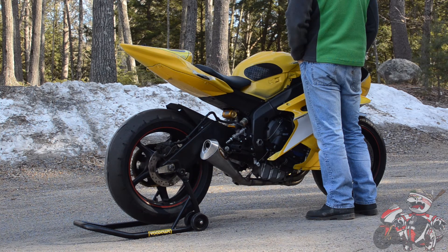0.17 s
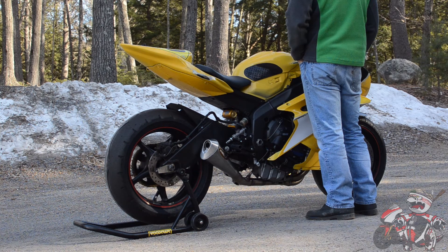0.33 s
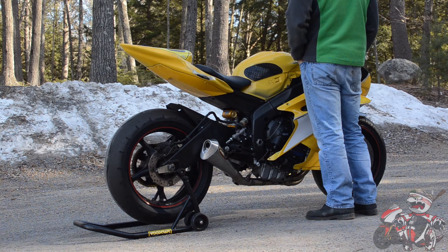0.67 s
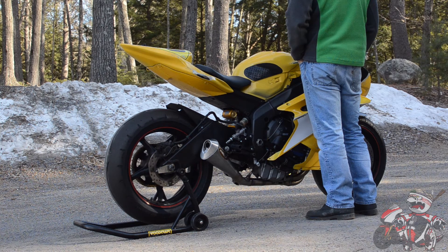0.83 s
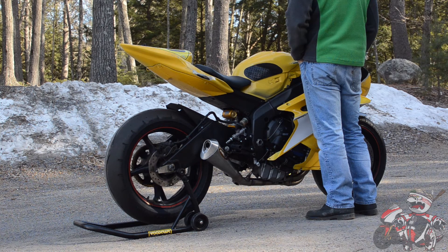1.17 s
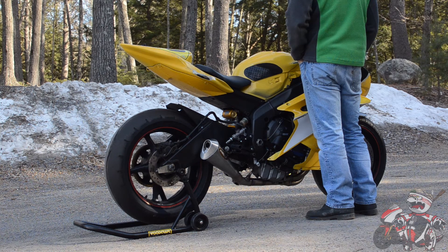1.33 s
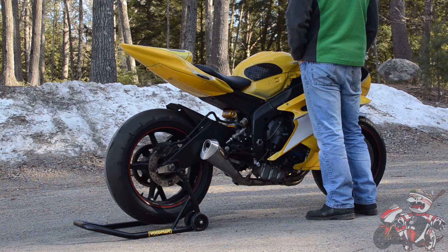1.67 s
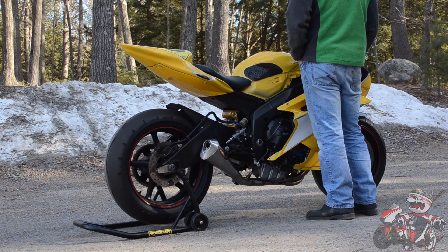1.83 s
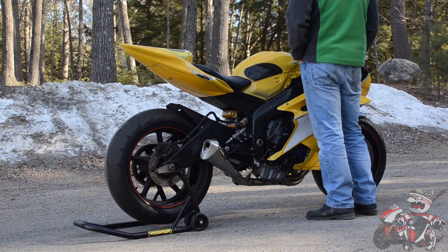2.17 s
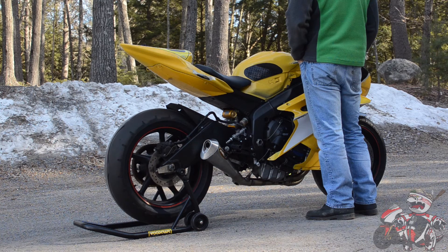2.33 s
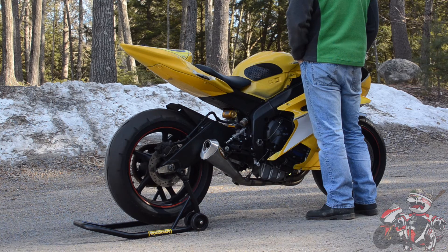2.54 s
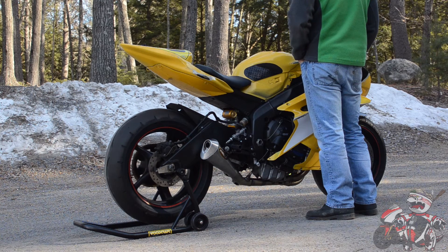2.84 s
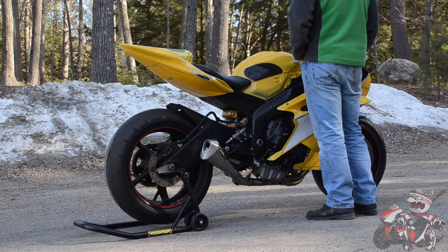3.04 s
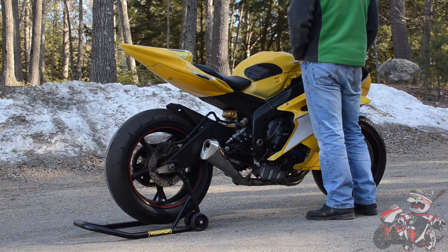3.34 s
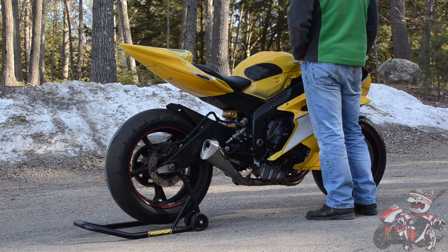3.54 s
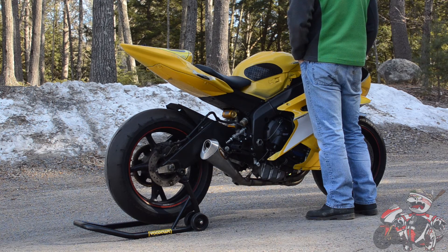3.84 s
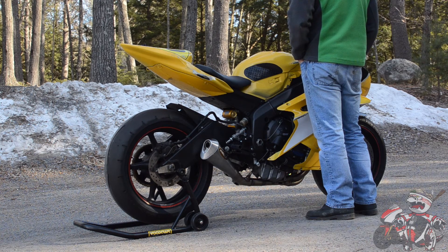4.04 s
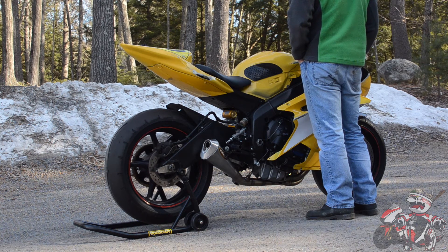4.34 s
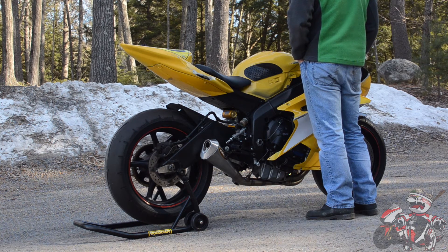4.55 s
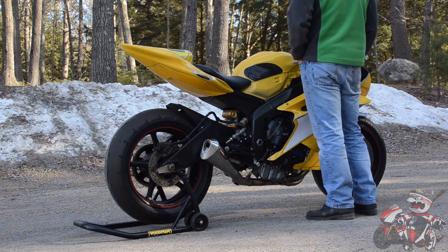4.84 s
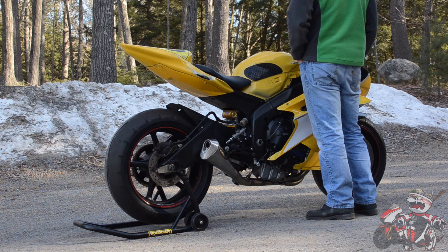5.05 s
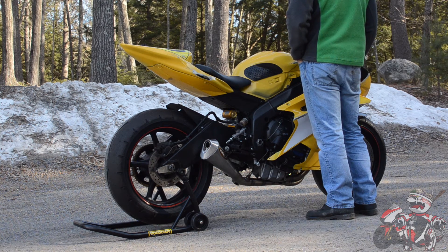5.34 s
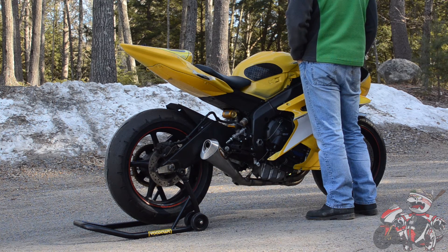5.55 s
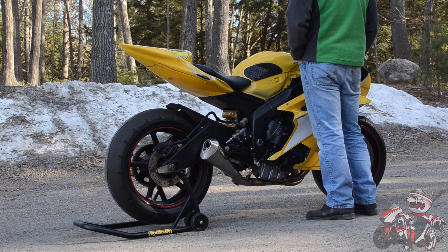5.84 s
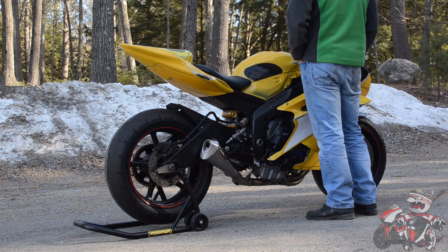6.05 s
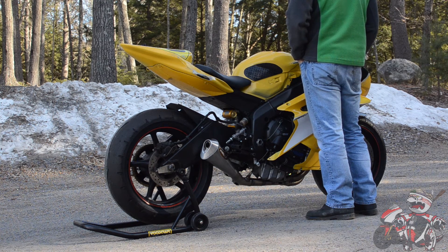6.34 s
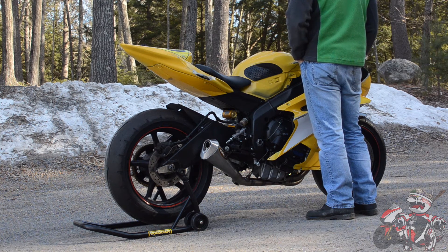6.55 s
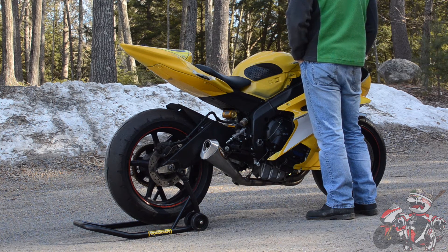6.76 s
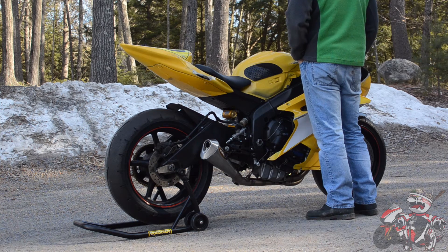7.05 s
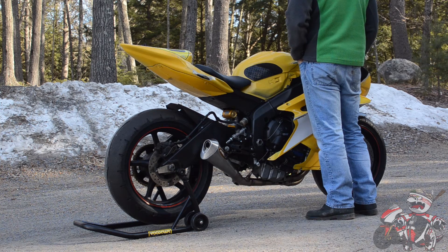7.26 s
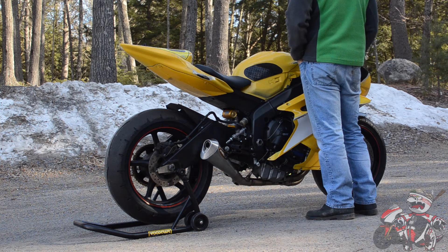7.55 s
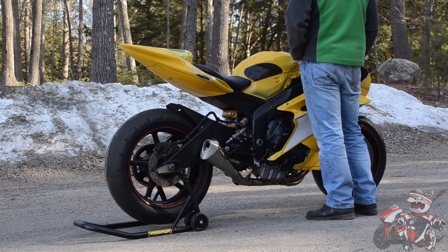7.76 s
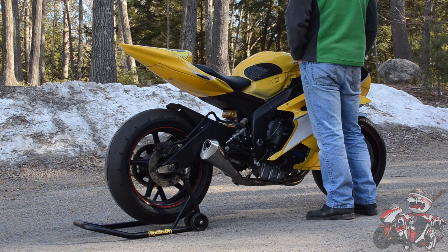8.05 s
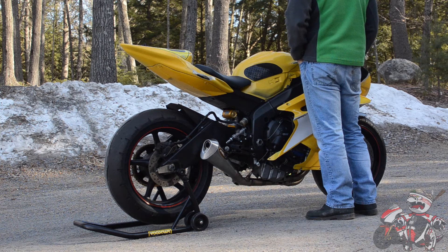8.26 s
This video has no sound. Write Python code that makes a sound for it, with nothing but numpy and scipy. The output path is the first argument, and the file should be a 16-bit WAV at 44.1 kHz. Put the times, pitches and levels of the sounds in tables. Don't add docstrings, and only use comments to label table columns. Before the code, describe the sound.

A four-cylinder sport motorcycle on a stand, heard close beside its short exhaust on an outdoor gravel road. It begins already revving with a tight, raspy buzz; from about 0.3 s the pitch sweeps up, reaching a loud, hard, metallic howl by 1.5 s. This is held until about 3.6 s, slightly rough with small stumbles. The throttle is let go with a sharp crack and a barking rasp, and the pitch slides steadily down, burbling, with thuddy pops between 4 and 4.8 s. Around 5.2 s it settles to a low, lumpy, breathy idle. From about 6.1 s a blip swells to a throaty bark, peaking near 6.5 s, then falls with scattered pops. A quicker blip rises at 7.4 s, peaks near 7.75 s, and drops away crackling. Faint, short tree echoes smear the sound; the loudest peaks are gritty and clipped.

```python
import sys
import numpy as np
from scipy import signal
from scipy.fft import rfft, irfft
from scipy.io import wavfile
from scipy.ndimage import uniform_filter1d

SR = 44100
rng = np.random.default_rng(int(sys.argv[2]) if len(sys.argv) > 2 else 0)


def field_ratio(decibels):
    return 10 ** (np.asarray(decibels, dtype=float) / 20)


def pcm_store(signal):
    levels = np.round(np.clip(np.atleast_2d(signal), -1, 1) * 32767)
    wavfile.write(sys.argv[1], SR, levels.astype(np.int16).T)


N = 370881

# frequency in Hz, gain in dB.
TURBULENCE = [(320, -19.5), (550, -6.5), (790, -6.5), (1020, -5), (1190, 1), (1420, 1.5), (1600, 2.5),
              (1860, 0.5), (2030, 3.5), (2190, 0.5), (2890, -3.5), (3300, -17), (3600, -4), (4680, -30),
              (7920, -120)]
# start in seconds, firings in Hz, pace down the coasting path,
# length of the fuel cut in seconds, extra spit in the cut in dB.
LIFTS = [
    (3.585, 458.3, 1.01, .47, 11.5),
    (6.465, 273, 1.14, 0.23, 1),
    (7.75, 278.8, 1.005, 0.173, 6),
]
# engine catches in seconds, twist begins in seconds, firings until then in Hz.
TWISTS = [
    (5.255, 6.11, 63.15),
    (7.39, 7.444, 90.45),
]
SETTLE_S = .02


def engine():
    hz = speed()
    levels_db, (uneven, turbulent, gated, paired) = throttle(hz)
    shut = np.clip(-uniform_filter1d(np.gradient(hz), 600) * SR / 90, 0, 1)
    blows, pulses, fronts, puff, snap = firings(hz, shut, uneven, paired)
    thump = pipe_thump(blows, hz, shut)
    rasp = muffler_rasp(pulses, puff, hz, shut, turbulent, gated)
    hiss = gas_hiss(puff, gated)
    spit = sharp_spit(fronts, puff, snap, gated)
    return (field_ratio(levels_db) * np.array([thump, rasp, hiss, spit])).sum(0)


def firings(hz, shut, uneven, paired):
    header_ms = .09
    turns = np.cumsum(hz) / SR
    count = np.arange(1, int(turns[-1]))
    places = np.interp(count, turns, np.arange(N))
    chance = rng.standard_normal((4000, 4))[:len(count)]
    strength_luck, timing_luck, puff_luck, snap_luck = chance.T
    at = places.astype(int)
    rough, odd, period, closed = uneven[at], paired[at], SR / hz[at], shut[at]
    pair = count % 2
    strong_weak = 1 - 2 * pair

    fired = 1 + .6 * odd * (1 - closed) * strong_weak
    wander = rough * (.08 + .09 * closed)
    shift = .27 * odd * pair * (odd > .13) + wander * timing_luck
    blows = clicks(places + period * shift, fired + rough * strength_luck)

    late = (header_ms * pair + 0.12 * rough * timing_luck) * SR / 1000
    pulses = clicks(places + late, (1 + odd * strong_weak) * (1 + .45 * rough * strength_luck))
    fronts = evened(clicks(places + late, field_ratio(5.0 * snap_luck)))

    t = np.arange(400) / SR
    puff = signal.oaconvolve(clicks(places, field_ratio(3.4 * puff_luck)), t * np.exp(-t / 0.0015))[:N]
    snap = signal.oaconvolve(clicks(places, field_ratio(3.2 * snap_luck)), t * np.exp(-t / 0.00061))[:N]
    return blows, pulses, fronts, evened(puff), evened(snap)


def pipe_thump(blows, hz, shut):
    # frequency in Hz, gain in dB.
    pipe_middle = [(18, -96), (30, -56), (90, 0), (150, 14), (200, 2.5), (265, 9.5), (320, 1), (400, 9),
                   (530, -1), (680, -8.5), (900, -7.5), (1980, -75)]
    pipe_slow = [(18, -99), (35, -29), (62, 4), (125, 7), (190, 8.5), (255, 6), (330, -1), (410, 1.5),
                 (470, -7.5), (520, -8.5), (650, -14.5), (900, -19.5), (1760, -107)]
    pipe_fast = [(18, -102), (50, -90), (110, -2.5), (160, -3), (230, 0), (290, -11.5), (360, 0),
                 (450, -11.5), (560, -6.5), (640, -24.5), (730, -10), (900, -27.5), (1980, -83)]
    slow = np.clip((120 - hz) / 50, 0, 1)
    fast = (1 - shut) * np.clip((hz - 185) / 55, 0, 1)
    echoed = blows + 0.42 * np.roll(blows, round(0.00659 * SR))
    slow_thump = evened(colour(echoed, pipe_slow, lag=0.92))
    fast_thump = evened(colour(blows, pipe_fast))
    open_blow = colour(blows, pipe_middle, lag=0.47)
    shut_blow = colour(blows, pipe_middle)
    middle_thump = evened((1 - shut) * open_blow + shut * shut_blow)
    thump = slow * slow_thump + fast * fast_thump + (1 - slow - fast) * middle_thump
    return evened(above_firing(thump, hz))


def above_firing(x, hz):
    f, t, z = signal.stft(x, SR, nperseg=2048, noverlap=1536)
    edge_hz = .55 * np.interp(t, np.arange(N) / SR, hz)
    gain = .2 + .8 / (1 + (edge_hz / (f[:, None] + 1)) ** 6)
    return signal.istft(z * gain, SR, nperseg=2048, noverlap=1536)[1][:N]


def muffler_rasp(pulses, puff, hz, shut, turbulent, gated):
    # frequency in Hz, gain in dB.
    muffler_hot = [(350, -39), (650, -24.5), (900, -14), (1080, -15.5), (1250, 0), (1400, -1), (1600, -9.5),
                   (1720, -10.5), (1850, 2), (2050, 6.5), (2300, -8.5), (2750, -7.5), (3250, -22),
                   (3800, -12), (5000, -18), (9900, -86.5)]
    muffler_cool = [(350, -57), (600, 2.5), (1000, -12), (1500, 6.5), (1750, -5), (2050, 5), (2500, -8.5),
                    (3300, -18), (4000, -12.5), (9900, -75)]
    muffler_shut = [(350, -28), (600, 10.5), (850, 2), (1050, 8.5), (1300, 11), (1500, 20), (1750, 3.5),
                    (2200, 13), (2500, 3), (2800, 11.5), (3250, -5.5), (3900, 4), (5000, -7), (9900, -90)]
    hot = np.clip((hz - 390) / 50, 0, 1)
    ring = hot * evened(colour(pulses, muffler_hot)) + (1 - hot) * evened(colour(pulses, muffler_cool))
    ring = (1 - shut) * ring + shut * evened(colour(pulses, muffler_shut))
    gusts = colour(rng.standard_normal(N) * (1 + 0.031 * gated * puff), TURBULENCE)
    return np.sqrt(1 - turbulent) * evened(ring) + np.sqrt(turbulent) * evened(gusts)


def gas_hiss(puff, gated):
    # frequency in Hz, gain in dB.
    hiss_tone = [(1760, -52.5), (3000, -2), (3250, -4.5), (3740, -8), (4570, -5.5), (5260, -6), (5660, -1),
                 (6200, -7), (8070, -8), (9030, -13.5), (11500, -34.5), (15000, -44), (22000, -120)]
    return evened(colour(rng.standard_normal(N) * (1 - gated + 0.26 * gated * puff), hiss_tone))


def sharp_spit(fronts, puff, snap, gated):
    # frequency in Hz, gain in dB.
    spit_tone = [(5590, -16), (9500, 8.5), (11500, -1), (12800, -1), (15600, -10)]
    spray = rng.standard_normal(N) * (1 - gated + gated * (.6 * puff + 1.3 * snap))
    return evened(colour(spray + 0.65 * gated * fronts, spit_tone))


def speed():
    # time in seconds, firings in Hz.
    climb = [
        (0.0, 282),
        (0.3, 283.6),
        (0.42, 293.4),
        (0.72, 353.3),
        (1.1, 421.6),
        (1.35, 444),
        (1.66, 451.2),
        (2.86, 454.2),
        (3.56, 459.5),
    ]
    # time since full speed in seconds, firings in Hz.
    coast = [(0, 459.2), (.17, 376.9), (.52, 261.8), (.78, 198.6), (1.1, 136.8), (1.29, 107.6),
             (1.43, 86.5), (1.62, 64.23), (1.7, 55)]
    rise = [(0, 0.01), (.38, .25), (.55, .46), (.8, .82), (.93, .98), (1, 0.98)]
    hunt_share, hunt_s = .0035, .09
    t = np.arange(N) / SR
    hz = np.interp(t, *np.transpose(climb))
    since, path = np.transpose(coast)
    twists = TWISTS + [(0, 99, 0)]
    peaks = LIFTS[1:] + [(100, 0)]
    for (lift, top_hz, pace, *_), (_, twist, rest_hz), (peak, peak_hz, *_) in zip(LIFTS, twists, peaks):
        entry = np.interp(-np.log(top_hz), -np.log(path), since)
        falling = np.exp(np.interp(entry + pace * (t - lift), since, np.log(path)))
        coasting = np.maximum(falling, rest_hz)
        climbed = np.interp((t - twist) / (peak - twist), *np.transpose(rise))
        rising = rest_hz + (peak_hz - rest_hz) * climbed
        hz = np.where(t < lift, hz, np.where(t < twist, coasting, rising))
    hunt = drift(N, hunt_s)
    return uniform_filter1d(hz, round(SETTLE_S * SR)) + hunt_share * np.sqrt(450 * hz) * hunt / hunt.std()


def throttle(hz):
    # firings in Hz, then pipe thump, muffler rasp,
    # gas hiss and sharp spit in dB.
    open_mix = [(62, -18.5, -28.5, -30, -47), (90, -11, -25, -27.5, -46), (106.15, -8, -21.5, -24, -39),
                (150, -5.5, -16, -22, -33.5), (220.1, -7, -9, -31, -39), (249.3, -11.5, -12.5, -26.5, -51),
                (285, -20, -12, -28.5, -49), (358.6, -18, -12, -27.5, -46), (433.4, -16.5, -11, -24.5, -39),
                (419, -18, -10.5, -24, -38.5)]
    shut_mix = [(68, -21, -28.5, -31.5, -54), (104, -18.5, -25.5, -28, -52), (137, -11, -22, -25.5, -48),
                (200, -14, -19, -25, -50), (266.7, -14, -18, -28, -49), (308.4, -18, -17, -26.5, -50),
                (365, -16.5, -15, -28.5, -49), (431.4, -15.5, -15, -25, -47)]
    # firings in Hz, then from 0-1 the
    burn_open = [(63, .21, .92, .8, .14), (150, .15, .6, .8, .05), (262, .12, .28, .55, .18),
                 (284, .24, .3, .3, .25), (310, .16, .09, .3, .2), (440, .14, .12, .3, .12)]
    burn_cut = [(200, .06, .33, .5, .3), (270, .05, .17, .5, .3), (450, .04, .08, .7, .3)]
    burn_lean = [(64, .25, .92, .8, .15), (110, .31, .82, .62, .13), (160, .24, .68, .55, .15),
                 (270, .22, .5, .55, .23)]
    # time in seconds, extra unevenness 0-1.
    stumbles = [
        (1.55, .1),
        (1.93, .22),
        (2.42, .18),
        (2.87, .22),
        (3.57, .12),
        (5.4, .12),
        (5.6, .15),
    ]
    stumble_s = .13
    dip_db, dip_s, bark_db, bark_s = -3.5, 0.013, 5.5, 0.31
    clean_s = 0.307
    surge_db, burble_db, surge_s = .55, .5, .03

    t = np.arange(N) / SR
    lift, _, _, cut_s, spit_db = np.transpose(LIFTS)[..., None]
    catch = np.append(np.transpose(TWISTS)[0], 99)[:, None]
    settle = round(SETTLE_S * SR)
    closed = uniform_filter1d(((t > lift) & (t < catch)).sum(0) * 1., settle)
    cuts = uniform_filter1d(((t > lift) & (t < lift + cut_s)) * 1., settle)
    cut = (cuts * np.clip((lift + clean_s - t) / SETTLE_S, 0, 1)).sum(0)
    lean = np.maximum(closed - cut, 0)

    levels = (1 - closed) * by_speed(open_mix, hz) + closed * by_speed(shut_mix, hz)
    levels[:2] += dip_db * np.exp(-((t - lift) / dip_s) ** 2).sum(0)
    bark = ((t > lift + dip_s) * np.exp(-abs(t - lift) / bark_s)).sum(0)
    levels[1:3] += bark_db * (hz / 450) ** 2 * bark
    levels[3] += (spit_db * cuts).sum(0)
    surge = drift((4, N), surge_s)
    levels += (surge_db + burble_db * lean) * surge / surge.std()

    burn = (1 - cut - lean) * by_speed(burn_open, hz)
    burn += cut * by_speed(burn_cut, hz) + lean * by_speed(burn_lean, hz)
    stumble = sum(extra * np.exp(-((t - s) / stumble_s) ** 2) for s, extra in stumbles) * (1 - cut)
    burn[:2] += stumble * np.array([[1], [.35]])
    return levels, np.clip(burn, 0, .98)


def by_speed(rows, hz):
    f, *columns = np.transpose(rows)
    return np.array([np.interp(np.log(hz), np.log(f), c) for c in columns])


def pops():
    # start in seconds, push peak in dB, crack in dB.
    pop_list = [(3.584, -45, -5), (4.042, -39, -4), (4.189, -33, -27), (4.329, -30, -11), (4.399, -21, -17),
                (4.449, -35, -21), (4.529, -22, -27), (4.619, -36, -27), (4.746, -19, -11),
                (6.459, -39, -12), (6.749, -31, -25), (6.799, -24, -24), (6.979, -17, -24),
                (7.089, -21, -23), (7.308, -23, -29), (7.739, -45, -7), (7.979, -34, -19),
                (8.019, -27, -14), (8.119, -22, -24), (8.199, -28, -22), (8.329, -22, -15)]
    s, push_db, crack_db = np.transpose(pop_list)
    t = np.arange(2500) / SR
    push = np.sin(2 * np.pi * 75 * t) * np.exp(-t / .02) * (1 - np.exp(-t / .003))
    crack = rng.standard_normal(len(t)) * np.exp(-t / .0009)
    crack = colour(np.pad(crack, (0, N - len(t))), TURBULENCE)[:len(t)]
    crack = crack / abs(crack).max()
    pushes = signal.oaconvolve(clicks(s * SR, field_ratio(push_db + 2.0)), push)
    cracks = signal.oaconvolve(clicks((s + 0.000966) * SR, field_ratio(crack_db + 1)), crack)
    return (pushes + cracks)[:N]


def tree_echoes(bike):
    t = np.arange(9000) / SR
    trees = rng.standard_normal(len(t)) * field_ratio(-60 * t / 0.15) * (t > .012)
    return field_ratio(-19) * signal.oaconvolve(bike, trees / np.linalg.norm(trees))[:N]


def colour(x, points, lag=1):
    f, db = np.transpose(points)
    hz = abs(np.fft.fftfreq(8192, 1 / SR))
    gain_db = np.interp(np.log(hz + 1), np.log(f + 1), db)
    log_gain = np.log(field_ratio(np.maximum(gain_db, -90)))
    taps = np.fft.ifft(np.exp(log_gain - 1j * lag * signal.hilbert(log_gain).imag)).real
    return signal.oaconvolve(x, np.roll(taps, 1024)[:5120])[1024:N + 1024]


def smoothed(x, size):
    return uniform_filter1d(uniform_filter1d(x, size), size)


def drift(shape, seconds):
    return smoothed(rng.standard_normal(shape), round(seconds * SR))


def evened(x):
    return x / np.sqrt(abs(smoothed(x ** 2, 3000)) + 1e-20)


def clicks(places, sizes):
    at = np.floor(places)[:, None].astype(int) + np.arange(-7, 9)
    off = at - places[:, None]
    shape = np.sinc(off) * np.cos(np.pi * off / 16) ** 2
    out = np.zeros(N + 64)
    np.add.at(out, np.clip(at, 0, N + 63), sizes[:, None] * shape)
    return out[:N]


def scene():
    bike = engine() + pops()
    return (bike + tree_echoes(bike))[None]


def low_pass(x):
    return signal.sosfilt(signal.butter(12, 15710, fs=SR, output="sos"), x)


def record(dry):
    # frequency in Hz, width in Hz, depth 0-1.
    notches = [(5690, 250, 0.96), (6920, 46, 0.8), (15050, 220, .7)]
    squeeze, low_cut_hz = .6, 50
    hz = np.fft.rfftfreq(N, 1 / SR)
    notch_gain = np.ones(len(hz))
    for f, width_hz, depth in notches:
        notch_gain *= 1 - np.clip(depth, 0, 1) / (1 + ((hz - f) / width_hz) ** 2)
    low_cut = 1 / np.sqrt(1 + (low_cut_hz / (hz + 1)) ** 6)
    squeezed = 1.054 * np.tanh(squeeze * dry) / squeeze
    heard = irfft(rfft(squeezed) * notch_gain * low_cut, N)
    return low_pass(np.clip(heard, -.99, .99))


dry = scene()
out = record(dry)
pcm_store(out)
```